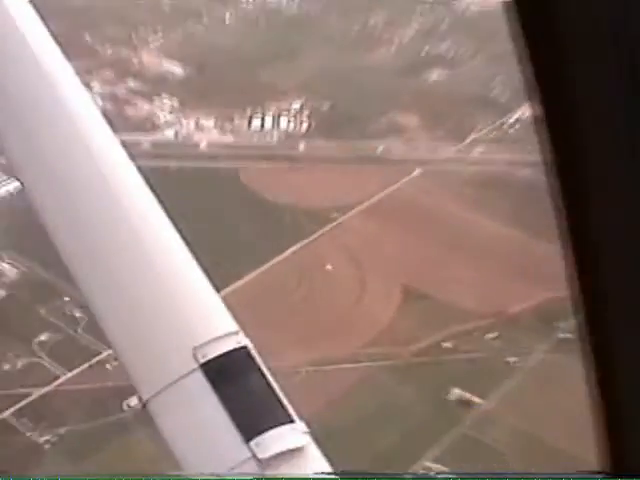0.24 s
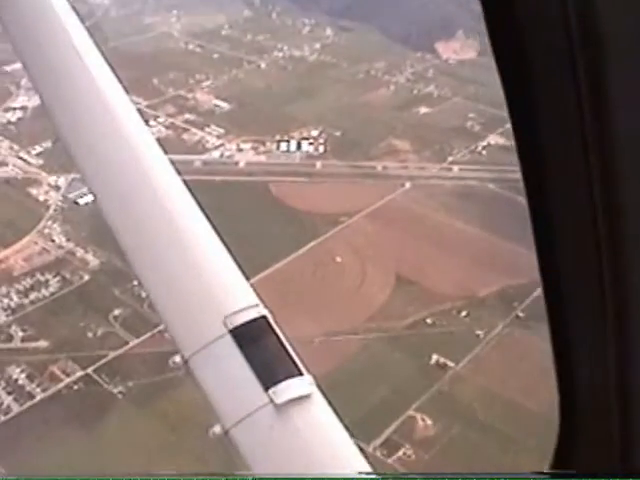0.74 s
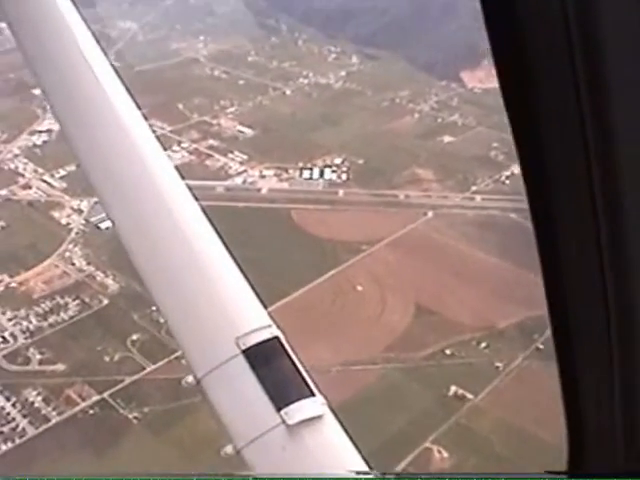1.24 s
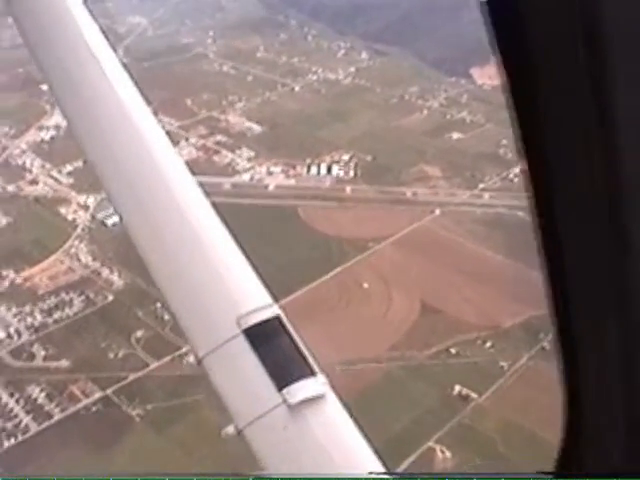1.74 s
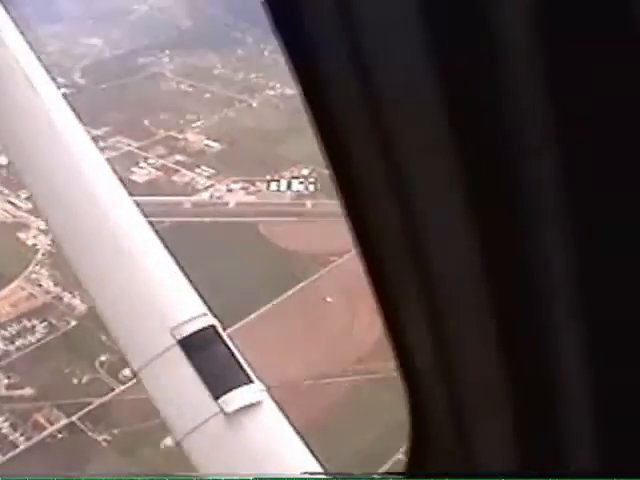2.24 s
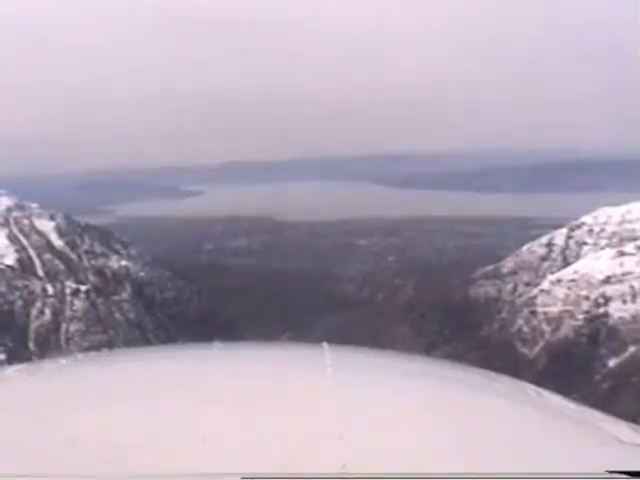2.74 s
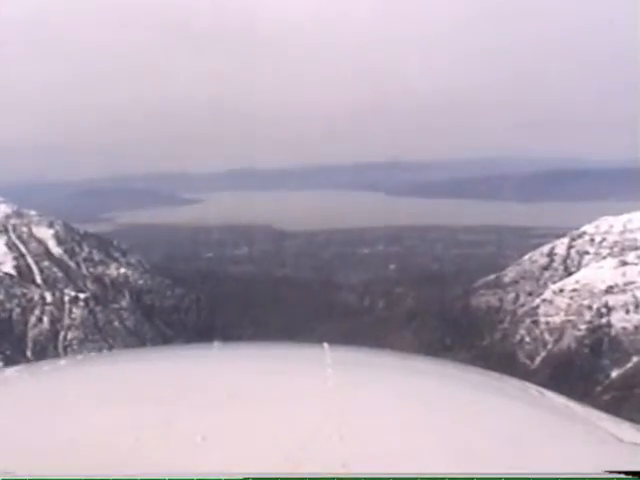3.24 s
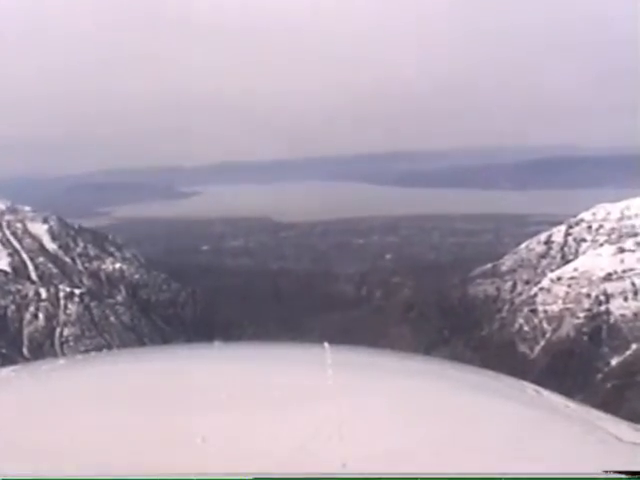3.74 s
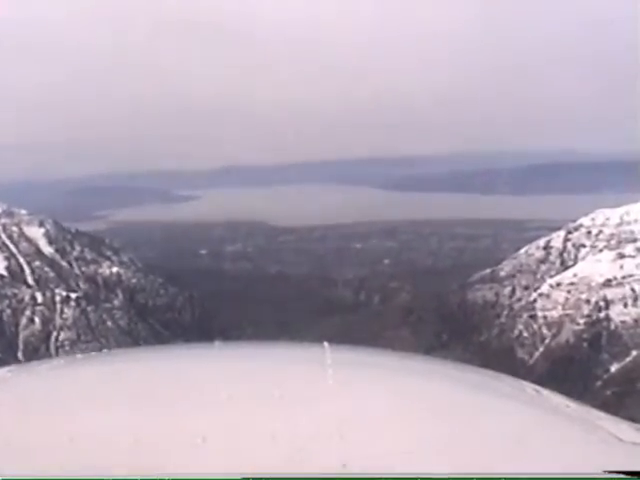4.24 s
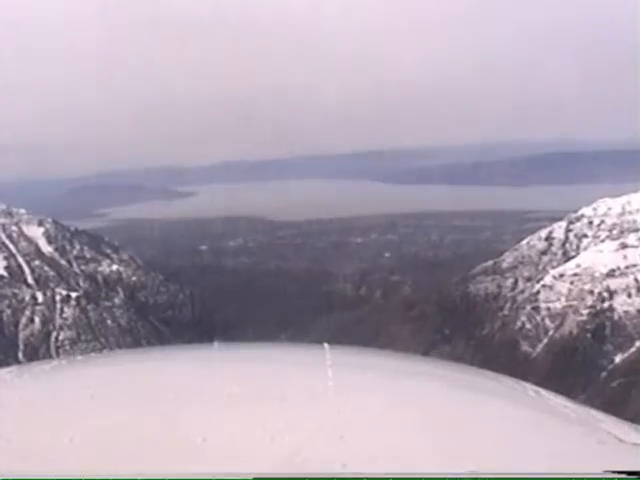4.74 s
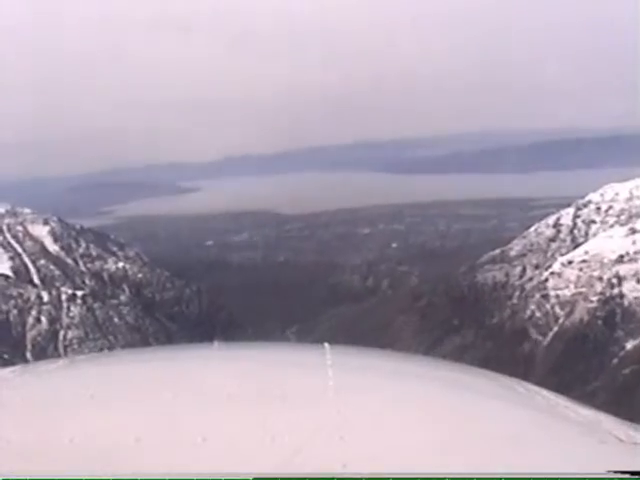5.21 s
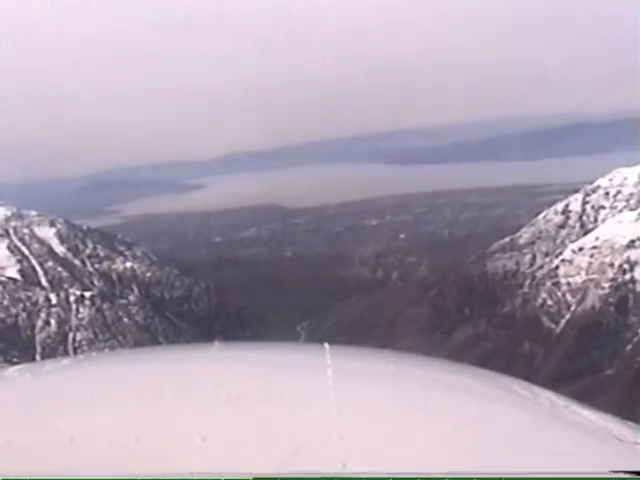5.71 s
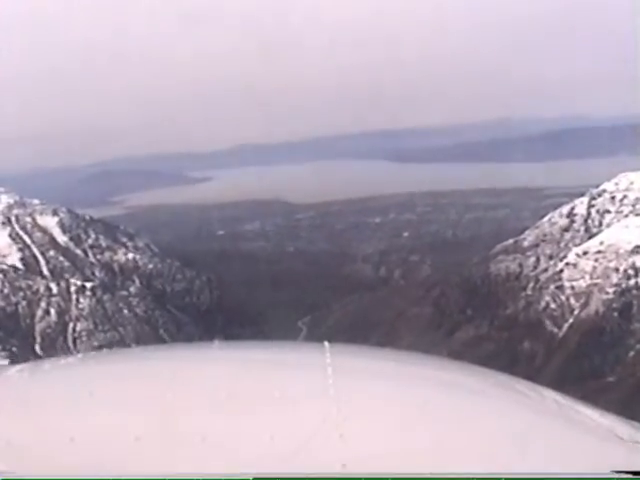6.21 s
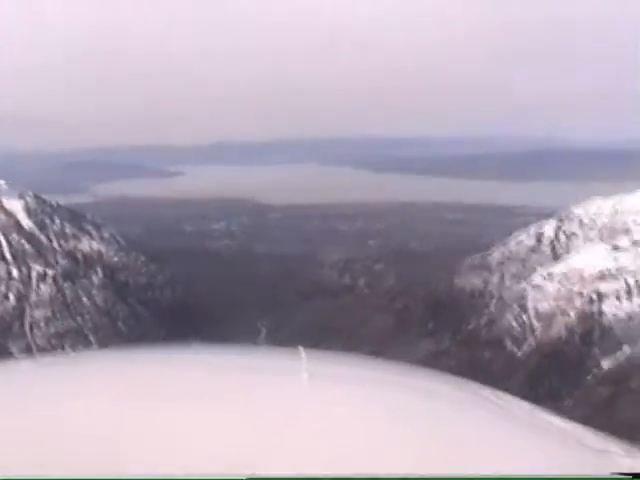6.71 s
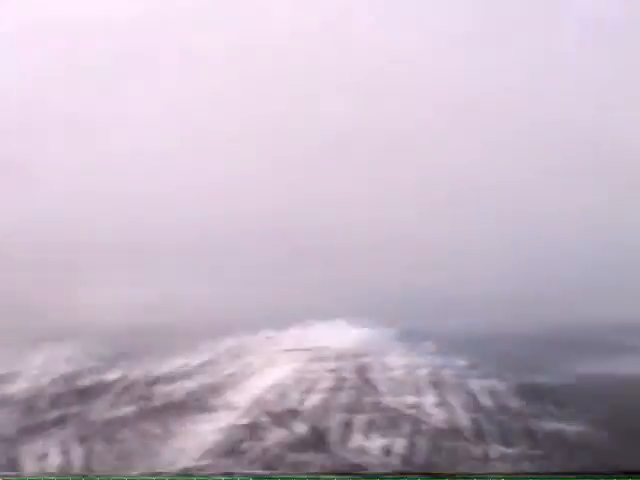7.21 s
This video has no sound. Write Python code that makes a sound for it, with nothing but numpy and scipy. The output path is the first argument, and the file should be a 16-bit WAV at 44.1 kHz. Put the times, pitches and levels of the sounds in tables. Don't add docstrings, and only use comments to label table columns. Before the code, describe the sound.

A light propeller plane's cabin drones steadily under rushing air, cuts abruptly to near silence for a second, then returns with a rougher, deeper roar.

```python
import sys
import numpy as np
from scipy import signal
from scipy.fft import rfft, irfft, next_fast_len
from scipy.io import wavfile
from scipy.ndimage import uniform_filter1d, map_coordinates

SR = 44100
rng = np.random.default_rng(int(sys.argv[2]) if len(sys.argv) > 2 else 0)


def generate_wav(signal):
    frames = np.transpose(np.atleast_2d(signal))
    scaled = np.clip(frames, -1, 1) * 32767
    pcm = np.round(scaled).astype(np.int16)
    wavfile.write(sys.argv[1], SR, pcm)


def elevation(decibels):
    levels = np.asarray(decibels, float)
    return 10 ** (levels / 20)


N = 328986
CUT_S = 3
MUTE_S, UNMUTE_S = 2.4812, 3.502
SWING_S, SWING_LENGTH_S = 7.03, 0.38


def unit(x):
    return x / np.sqrt(np.mean(x ** 2) + 1e-20)


def curve(rows):
    seconds, values = np.transpose(rows)
    return np.interp(np.arange(N) / SR, seconds, values)


def ramp(start_s, length_s):
    return np.clip((np.arange(N) / SR - start_s) / length_s, 0, 1)


def wobble(rate):
    coarse = np.arange(0, N + 64, 64)
    knots = rng.standard_normal(int(N * rate / SR) + 4)
    smooth = map_coordinates(knots, [coarse * rate / SR])
    return np.interp(np.arange(N), coarse, smooth)


def coloured(x, spectrum, peaks=()):
    m = next_fast_len(N + 8192)
    hz = np.fft.rfftfreq(m, 1 / SR)
    f, db = np.transpose(spectrum)
    gain_db = np.interp(np.log(hz + 1), np.log(f + 1), db)
    for centre, width, boost_db in peaks:
        gain_db = gain_db + boost_db / (1 + (2 * (hz - centre) / width) ** 4)
    return unit(irfft(rfft(x, m) * elevation(gain_db), m)[:N])


def circuit_rumble(live):
    # (frequency [Hz], level [dB])
    circuit_spectrum = [(4, 0), (12, 0), (20, -7), (45, -8), (75, -25), (130, -26), (500, -44), (1500, -60),
                        (3000, -80)]
    creep_db = 2.5 * np.arange(N) / SR
    rumble_db = -77 + creep_db + 6 * (1 - live)
    return elevation(rumble_db + 2.5 * wobble(8)) * coloured(rng.standard_normal(N), circuit_spectrum)


def circuit_hiss():
    opened = ramp(MUTE_S, 0.1) - ramp(UNMUTE_S + 0.6, 0.3)
    return elevation(-99 + 11 * opened) * rng.standard_normal((2, N))


def scan_whine():
    # (frequency [Hz], left level [dB], right level [dB])
    whine_tones = [
        (7999.5, -91, -91),
        (15734.3, -79, -115),
    ]
    t = np.arange(N) / SR
    return sum(np.sqrt(2) * elevation([[left], [right]]) * np.sin(2 * np.pi * hz * t)
               for hz, left, right in whine_tones)


def field_buzz():
    # (frequency [Hz], level [dB])
    buzz_spectrum = [(60, -8), (180, 1), (480, -6.5), (700, -18), (1000, -11.5), (1400, -19), (1900, -17.5),
                     (2600, -36), (4000, -25), (15500, -34.5)]
    field_hz = 59.94
    clicks = np.diff(np.floor(np.arange(N) / SR * field_hz), prepend=0)
    return elevation(-79) * coloured(clicks, buzz_spectrum)


def carrier_loss():
    # (frequency [Hz], level [dB])
    static_spectrum = [(50, 4), (300, -3), (1000, -11.5), (6000, -14.5), (14000, -28), (15700, -47.5)]
    since_mute = np.arange(N) / SR - MUTE_S
    lost = (since_mute > 0) * elevation(-60 * ramp(MUTE_S + 0.054, 0.025))
    fade = elevation(-47 - 150 * np.maximum(since_mute, 0))
    return lost * fade * coloured(rng.standard_normal(N), static_spectrum)


def electronics(live):
    left_only = (field_buzz() + carrier_loss()) * [[1], [0]]
    return circuit_rumble(live) + circuit_hiss() + scan_whine() + left_only


def turbulence(patchy_db):
    z = signal.stft(rng.standard_normal(N + 512), nperseg=512)[2]
    field = uniform_filter1d(rng.standard_normal(z.shape), size=5, axis=0)
    field = uniform_filter1d(field, size=10, axis=1)
    return signal.istft(z * elevation(patchy_db * unit(field)), nperseg=512)[1][:N]


def airflow_hiss(shot):
    # (frequency [Hz], level [dB per Hz])
    hiss_spectra = [
        [(710, -30), (1200, -4), (1880, 0), (2540, -3.5), (3660, -4), (5800, -7), (7200, -14), (9400, -17),
         (11300, -23), (13100, -29), (14600, -35), (15700, -41)],
        [(710, -30), (1200, -4), (1820, -4), (2680, -9), (4340, -10), (4840, -13), (8500, -21), (11200, -22),
         (11800, -26), (12600, -23.5), (13200, -29), (14100, -30.5), (14500, -35.5), (15700, -37)],
    ]
    # (frequency [Hz], width [Hz], boost [dB])
    slot_peaks = [
        [(1940, 300, 1.4), (3130, 150, 1.7), (3720, 220, 2)],
        [(1587, 14, 10), (2420, 86, 4.3), (3110, 88, 4.2), (3240, 85, 7.2), (3420, 170, 3.5), (4250, 300, 1.7),
         (7900, 150, 3), (8750, 160, 2.2)],
    ]
    return coloured(turbulence(patchy_db=0.7), hiss_spectra[shot], slot_peaks[shot])


def late_swing():
    return ramp(SWING_S + 0.66 * SWING_LENGTH_S, 0.34 * SWING_LENGTH_S)


def panel_roar(shot):
    # (frequency [Hz], level [dB per Hz])
    roar_spectra = [
        [(10, -31.5), (30, -19.5), (70, -7), (130, -1), (300, -1), (500, -3.5), (720, -9.5), (820, -12.5),
         (1000, -13), (1400, -19.5), (2500, -47.5), (6000, -90)],
        [(10, -31), (30, -13), (57, -5), (75, -5.5), (130, -3), (230, 1), (285, -4), (350, 3), (600, -3.5),
         (860, -4), (1100, -9), (1500, -15), (2500, -51), (6000, -90)],
    ]
    # (frequency [Hz], width [Hz], boost [dB])
    cabin_peaks = [
        [(420, 40, -2.5), (680, 36, 2), (923, 53, 7), (1017, 52, 5.5)],
        [(664, 160, 3.5), (773, 98, 9.5), (916, 35, 9.5), (1190, 31, 2), (1026, 49, 4.5), (1320, 80, 3)],
    ]
    # (frequency [Hz], width [Hz], boost [dB])
    turned_peaks = [(482, 24, 5.5), (598, 34, 5), (720, 90, -11), (955, 260, 5.5)]
    air = turbulence(patchy_db=0.7)
    level_view = coloured(air, roar_spectra[shot], cabin_peaks[shot])
    upward_view = coloured(air, roar_spectra[shot], turned_peaks)
    swing = late_swing()
    return (1 - swing) * level_view + swing * upward_view


def rushing_air(shot, turns, lean):
    # (roar [dB], hiss [dB], roar change at full lean [dB], hiss change at full lean [dB])
    air_levels = [
        (-26.5, -32.5, 3, 2),
        (-18.5, -29.5, -0.73, -0.9),
    ]
    roar_db, hiss_db, roar_lean_db, hiss_lean_db = air_levels[shot]
    moving_db = engine_throb(shot, turns) + 0.48 * wobble(6)
    roar = elevation(roar_db + roar_lean_db * lean + moving_db) * panel_roar(shot)
    hiss = elevation(hiss_db + hiss_lean_db * lean + moving_db) * airflow_hiss(shot)
    swing_gain = elevation(5.5 * ramp(SWING_S, SWING_LENGTH_S))
    hiss = hiss + (swing_gain - 1) * uniform_filter1d(hiss, size=3)
    return roar + hiss


# (throb per cam turn [dB], throb per firing [dB], ignition tick [dB])
ENGINE_MARKS = [
    (0.8, 0.94, -68.5),
    (0.5, 0.7, -63.5),
]


def engine_throb(shot, turns):
    cam_db, fire_db, _ = ENGINE_MARKS[shot]
    return cam_db * np.cos(np.pi * turns / 2) + fire_db * np.cos(2 * np.pi * turns)


def ignition_ticks(shot, turns):
    tick_db = ENGINE_MARKS[shot][2]
    spark = np.exp(40 * (np.cos(2 * np.pi * turns + 2.5) - 1)) * rng.standard_normal(N)
    bright = [(5000, -40), (8000, 0), (12000, 0), (13500, -25), (15500, -50)]
    return elevation(tick_db) * coloured(spark, bright)


def engine_turns(shot):
    # (time [s], firing rate [Hz])
    engine_speed = [
        [(0, 85.68), (1.3, 86.14), (2.2, 86.8), (2.48, 86.8)],
        [(3.53, 81.75), (4.5, 82.12), (5.25, 81.68), (5.8, 81.0), (6.8, 80.62), (7.46, 81.3)],
    ]
    return np.cumsum(curve(engine_speed[shot])) / SR


def camera_lean(shot):
    # (time [s], lean [0-1])
    lean_points = [
        [(0, 0), (.35, 0), (.65, .45), (.95, 0.83), (1.24, 0.14), (1.55, 0.73), (1.86, .99), (2.2, 0.72),
         (2.48, 0.47)],
        [(3.53, .3), (4.1, 0), (4.7, 0.46), (5.05, 0.4), (5.35, 0.4), (5.7, 0.67), (6.2, 0.95), (6.8, .72),
         (7.46, 0.6)],
    ]
    return curve(lean_points[shot])


def order(turns, k, db, sway_db, drift):
    phase = 2 * np.pi * (k * turns + rng.random()) + drift * np.sqrt(k) * wobble(7)
    return np.sqrt(2) * elevation(db + sway_db * wobble(9)) * np.sin(phase)


def engine_drone(shot, turns, lean):
    # (level at no lean [dB], change at full lean [dB], power of the lean [-],
    # change once swung up [dB])
    firing_orders = [
        [(-32.5, 0, .9, 0.1), (-15.8, -5.5, 1.3, 0.1), (-26, 6, .9, 0.1), (-30.5, 5.5, .35, 0.1),
         (-35.5, -5.5, .6, 0.1)],
        [(-23, -0.6, .9, -1.9), (-24.5, 0.1, .9, -6.5), (-37, 7.5, 1.8, 1.5), (-33.5, 9.5, 0.51, -1.7),
         (-45.5, 21, 1.8, -0.5)],
    ]
    # (multiple of firing rate [-], level [dB])
    minor_orders = [
        [(.5, -54.5), (1.25, -42), (1.75, -41), (2.25, -39), (2.5, -46.5), (3.25, -46.5), (4.75, -41),
         (6, -39.5), (6.25, -45), (7.25, -46), (7.75, -48), (8, -44), (9, -51), (10, -53), (13, -45)],
        [(.75, -50), (2.25, -49.5), (5.5, -54), (7, -44), (8, -39.5), (9, -44)],
    ]
    # (multiple of firing rate [-], level [dB])
    swung_orders = [(6, -27), (7.5, -28)]
    early_swing = ramp(SWING_S, 0.25 * SWING_LENGTH_S)
    drone = np.zeros(N)
    for k, (db, lean_db, power, swung_db) in enumerate(firing_orders[shot], start=1):
        level_db = db + lean_db * np.abs(lean) ** power + swung_db * early_swing
        drone += order(turns, k, level_db + 0.25, sway_db=0.85, drift=0.06)
    for k, db in minor_orders[shot]:
        drone += order(turns, k, db + 4, sway_db=2.5, drift=0.2)
    swell = late_swing() ** 2
    for k, db in swung_orders:
        drone += swell * order(turns, k, db, sway_db=2.0, drift=0.2)
    return drone


def cabin(shot):
    turns = engine_turns(shot)
    lean = camera_lean(shot)
    return rushing_air(shot, turns, lean) + ignition_ticks(shot, turns) + engine_drone(shot, turns, lean)


def scene():
    first_shot = np.arange(N) < CUT_S * SR
    sound = np.where(first_shot, cabin(shot=0), cabin(shot=1))
    return np.array([sound, np.zeros(N)])


def tape_gain():
    t = np.arange(N) / SR
    fall = np.exp(-np.maximum(t - MUTE_S, 0) / 0.0002)
    rise = (1 - np.exp(-np.maximum(t - UNMUTE_S, 0) / 0.0075)) ** 3
    return fall + rise


def thinned_treble(x, edge_hz, spread_hz, sparse):
    hz, t, z = signal.stft(x, SR, nperseg=1024)
    at = np.minimum((t * SR).astype(int), N - 1)
    edge = edge_hz + spread_hz * np.round(wobble(16)[at])
    typical = uniform_filter1d(uniform_filter1d(np.abs(z), size=24, axis=1), size=9, axis=2)
    threshold = sparse * typical * np.clip((hz[:, None] - 8000) / 7000, 0, 1)
    kept = (hz[:, None] < edge) * (np.abs(z) >= threshold)
    return signal.istft(z * kept, SR, nperseg=1024)[1][:, :N]


def top_cut(x):
    return signal.sosfilt(signal.butter(12, 15760, fs=SR, output="sos"), x)


def record(dry):
    squeezed = dry / (1 + np.abs(dry / 0.5) ** 4) ** (1 / 4)
    live = tape_gain()
    busy = uniform_filter1d(live, size=2048)
    tape = squeezed * live + electronics(live)
    thin = thinned_treble(tape, edge_hz=15780, spread_hz=900, sparse=0.95)
    mix = busy * thin + (1 - busy) * tape
    return top_cut(mix)


dry = scene()
out = record(dry)
generate_wav(out)
```